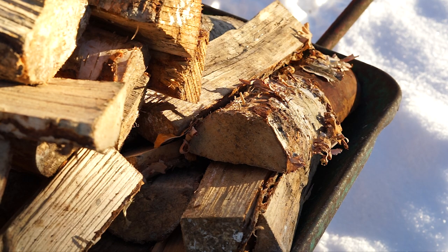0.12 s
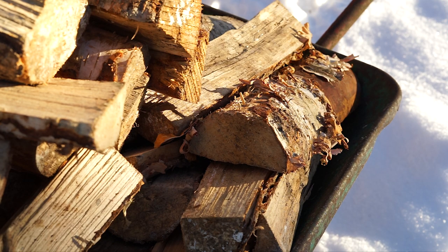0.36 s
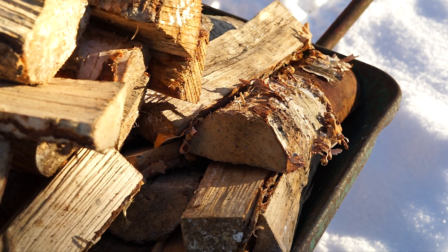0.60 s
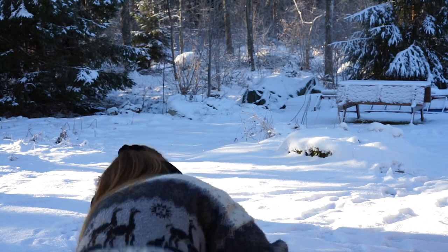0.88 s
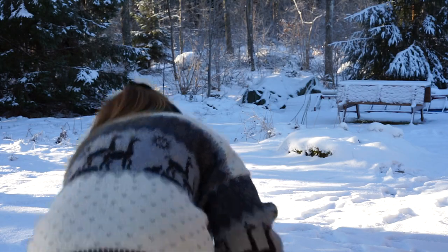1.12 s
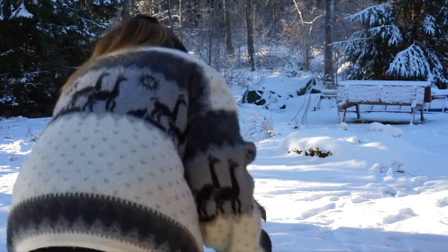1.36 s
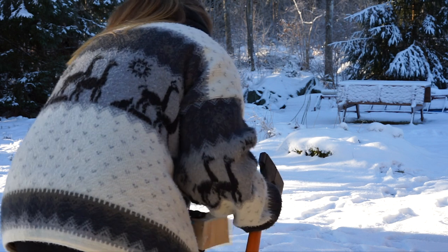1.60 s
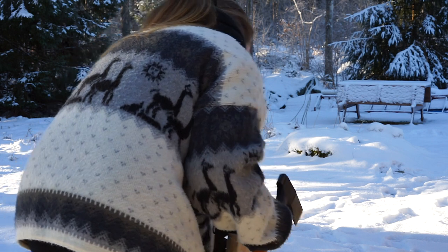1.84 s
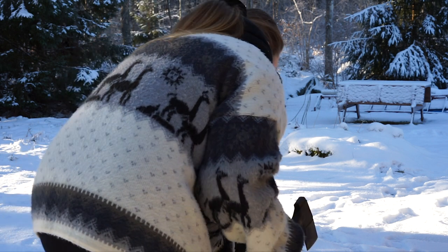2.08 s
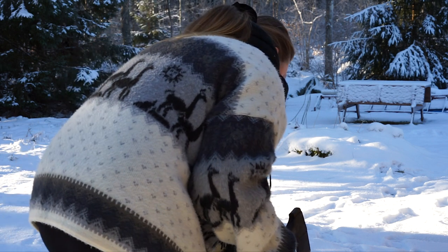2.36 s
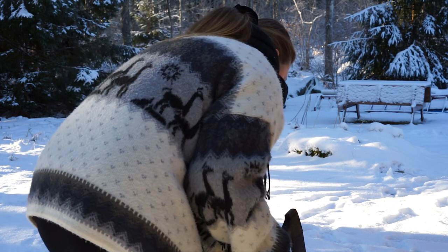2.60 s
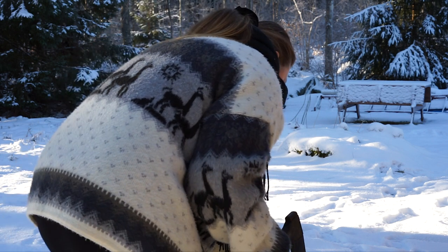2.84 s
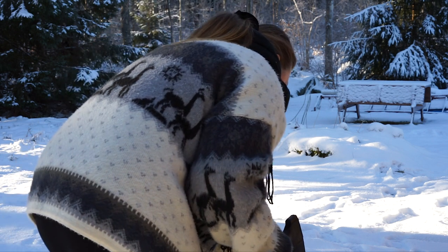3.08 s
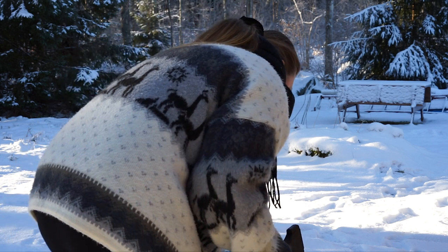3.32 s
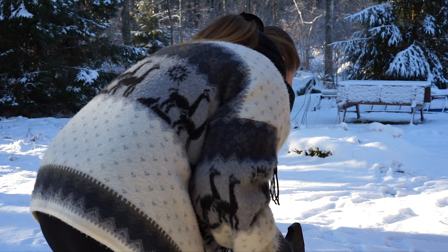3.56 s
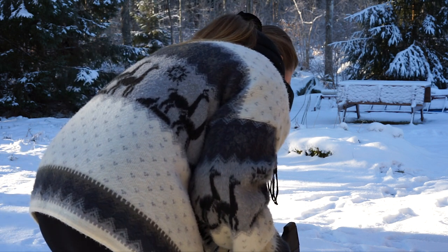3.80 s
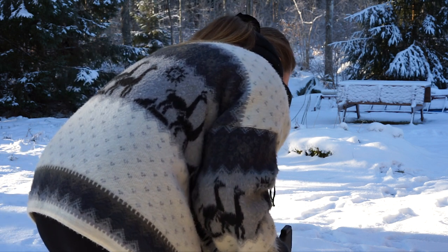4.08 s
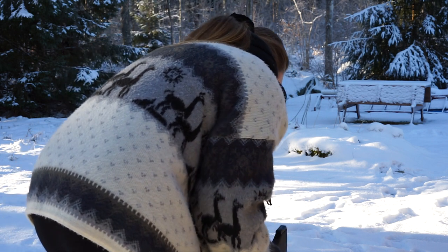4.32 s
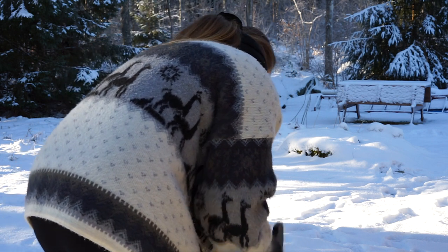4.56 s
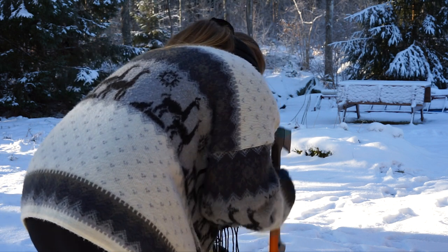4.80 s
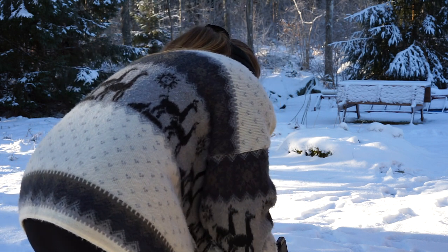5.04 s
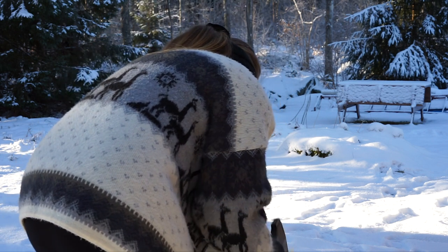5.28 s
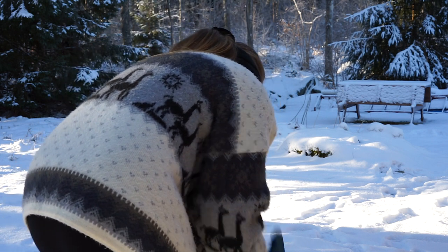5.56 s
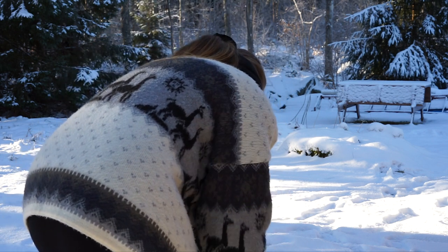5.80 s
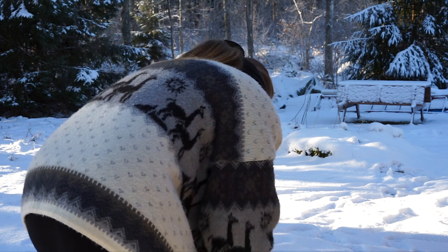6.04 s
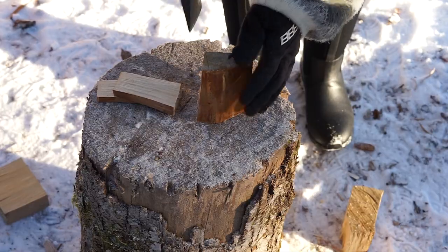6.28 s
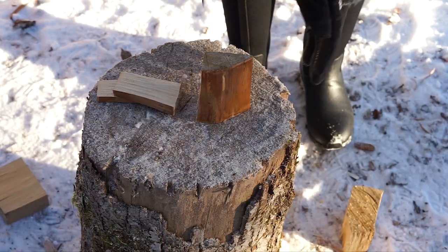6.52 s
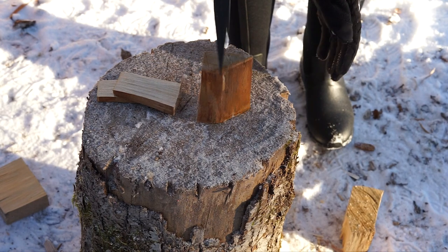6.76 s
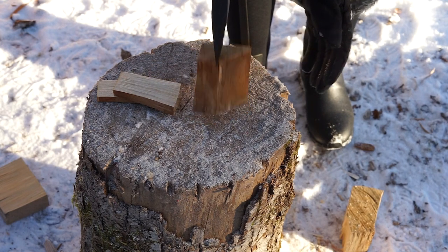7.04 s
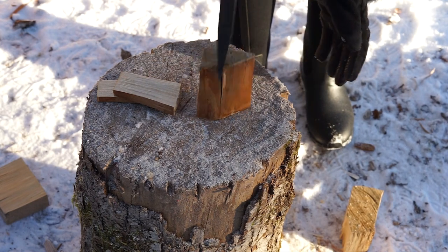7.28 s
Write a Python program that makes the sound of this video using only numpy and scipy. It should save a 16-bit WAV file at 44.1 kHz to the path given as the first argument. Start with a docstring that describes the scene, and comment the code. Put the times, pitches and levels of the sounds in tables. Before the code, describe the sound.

A hatchet splits wood on a chopping block in a snowy garden, hard cracks echoing off trees after birdsong, cloth rustle and quiet handling knocks.

```python
"""A hatchet splits billets on a chopping block in a snowy garden, heard from three spots one after another.
First, filtered noise murmurs as far traffic under a fading drone, sliding tones chirp and light taps click.
At the second spot clothes rustle in grainy noise, damped low tones thud, and struck resonances of wood and
steel crack with an answer from the trees. After a short dip in level the third spot brings thin whistles,
a faint regular ticking of noise puffs and the last two blows."""
import sys
import numpy as np
from scipy import signal
from scipy.fft import rfft, irfft, next_fast_len
from scipy.io import wavfile
from scipy.ndimage import uniform_filter1d, map_coordinates

SR = 44100
rng = np.random.default_rng(int(sys.argv[2]) if len(sys.argv) > 2 else 0)


def bounce(signal):
    """Save signal as a 16-bit WAV file at the path given by the first command-line argument."""
    frames = np.transpose(np.atleast_2d(signal))
    limited = np.clip(frames, -1, 1)
    pcm = np.round(limited * 32767).astype(np.int16)
    wavfile.write(sys.argv[1], SR, pcm)


def to_linear_factor(level_db):
    """Convert decibel levels (scalar or array-like) to linear amplitude factors."""
    exponent = np.asarray(level_db, float) / 20
    return 10 ** exponent


N = 325899
T = np.arange(N) / SR

# The three listening spots. Each row: start in seconds, then levels of murmur, near scatter and tree answer
# in dB, left-over-right balance in dB, level of the ground shudder against its thud in dB.
SPOTS = [(0, -42.5, -45, -16.5, -3, -4), (0.716, -52, -11, -21, -2.5, -5.5), (6.2, -54, -28, -44, -0.5, -8)]


def unit(x):
    """Bring to rms 1."""
    return x / np.sqrt(np.mean(x ** 2) + 1e-20)


def along(points, hz):
    """Read a curve of (Hz, value) points on a log frequency axis."""
    f, v = np.transpose(points)
    return np.interp(np.log(hz + 1), np.log(f + 1), v)


def wobble(rate):
    """A smooth random curve with rate knots a second."""
    return map_coordinates(rng.standard_normal(int(N * rate / SR) + 4), [T * rate])


def filtered(x, response):
    """Shape x by a complex response of frequency."""
    m = next_fast_len(x.shape[-1] + 8192)
    return irfft(rfft(x, m) * response(np.fft.rfftfreq(m, 1 / SR)), m)[..., :x.shape[-1]]


def add(track, s, sound):
    """Mix a sound into a track at time s; it ends where the listening spot changes."""
    end = next((row[0] for row in SPOTS if row[0] > s), N / SR)
    part = track[..., max(round(s * SR), 0):round(end * SR)][..., :sound.shape[-1]]
    part += sound[..., :part.shape[-1]]


def spot(s):
    """Index of the listening spot at time s."""
    return np.searchsorted([row[0] for row in SPOTS], s, "right") - 1


def bursts(rows, edge_s):
    """Gain curve of (start s, length s, dB) rows, each with soft edges."""
    gain = 0
    for s, length, db in rows:
        inside = np.minimum(T - s, s + length - T)
        gain = gain + to_linear_factor(db) * np.clip(inside / edge_s + .5, 0, 1) ** 2
    return gain


def rush(spectrum, alike, patchy_db):
    """Stereo noise of rms 1 with patches of random gain; alike sets the left-right likeness by frequency."""
    z = signal.stft(rng.standard_normal((2, N)), nperseg=512)[2]
    field = uniform_filter1d(rng.standard_normal(z.shape[1:]), size=6, axis=0)
    field = uniform_filter1d(field, size=12, axis=1)
    pair = signal.istft(z * to_linear_factor(patchy_db * unit(field)), nperseg=512)[1][:, :N]

    def mid_side(hz):
        turn = np.arccos(np.clip(along(alike, hz), -1, 1)) / 2
        return to_linear_factor(along(spectrum, hz)) * [np.cos(turn), np.sin(turn)]

    mid, side = filtered(pair, mid_side)
    return unit(np.array([mid + side, mid - side]))


def answers(near_db, trees_db, seconds=1):
    """A fresh stereo response of decaying noise: short scatter nearby, then a later swell from the trees."""
    # Scatter off block, logs and ground. Each row: frequency in Hz, t60 in seconds.
    near_decay = [(300, 0.2), (2000, 0.21), (6000, 0.16), (12000, 0.017)]
    # Swell of the tree answer before the treble loss. Each row: delay in seconds, level in dB.
    tree_swell = [(0, -3.5), (.075, -20), (.092, -1.5), (.113, -4.5), (.14, -9), (.2, -10.5), (.25, -17),
                  (.45, -16), (.8, -22)]
    # Colour of the tree answer before the treble loss. Each row: frequency in Hz, level in dB.
    tree_colour = [(500, -29), (1400, 5.5), (2000, 1), (3200, 5.5), (5000, 0.5), (7000, -4), (9000, -18),
                   (16000, -18)]
    far_loss_db_per_s_khz = 10  # later answers come from farther and are duller
    hz, t, z = signal.stft(rng.standard_normal((2, 2, round(seconds * SR))), SR, nperseg=256)
    near = to_linear_factor(-60 * t / along(near_decay, hz)[:, None])
    swell = np.interp(t, *np.transpose(tree_swell), right=-90)
    far_loss = far_loss_db_per_s_khz * np.outer(hz / 1000, t)
    trees = to_linear_factor(swell + along(tree_colour, hz)[:, None] - far_loss)
    lumps = uniform_filter1d(rng.standard_normal(trees.shape), size=24, axis=0)
    lumps = uniform_filter1d(lumps, size=3, axis=1)
    trees = trees * to_linear_factor(3.0 * unit(lumps))  # trunks answer one by one
    near_tail, tree_tail = signal.istft(z * np.array([near, trees])[:, None], SR, nperseg=256)[1]
    near_part = to_linear_factor(near_db) * near_tail / np.linalg.norm(near_tail[0])
    return near_part + to_linear_factor(trees_db) * tree_tail / np.linalg.norm(tree_tail[0])


def murmur():
    """Far traffic and microphone hiss as noise coloured anew at each spot; a drone of sines fades at the first."""
    # Noise colours, one list per spot. Each row: frequency in Hz, relative density in dB per Hz.
    colours = [
        [(15, -32), (25, -1), (49, -6), (190, -13.5), (277, -14), (317, -11), (363, -10.5), (463, -12),
         (818, -6.5), (1700, -19.5), (4610, -30), (16000, -38.5)],
        [(15, -22), (25, 2.5), (102, 1), (161, -3), (301, -0.5), (335, -1), (373, -3.5), (545, -3.5),
         (714, -4.5), (1790, -15), (1940, -15.5), (16000, -26)],
        [(15, -35), (25, -20), (64, -11), (127, -15), (185, -15), (326, -15.5), (384, -21), (439, -16.5),
         (796, -18), (1890, -27), (7310, -34.5), (16000, -42.5)],
    ]
    # Left-right likeness of the noise. Each row: frequency in Hz, likeness from 0 to 1.
    likeness = [(60, 0.56), (180, 0.24), (550, 0.65), (1650, 0.05), (4970, 0), (15000, 0)]
    # Drone tones before their fade. Each row: frequency in Hz, middle level in dB.
    drone_tones = [(292, -50.5), (363, -49.5)]
    here = spot(T)
    noise = 0
    for k, colour in enumerate(colours):
        noise = noise + (here == k) * to_linear_factor(SPOTS[k][1]) * rush(colour, likeness, patchy_db=1.0)
    drone = sum(to_linear_factor(db + 3.7 * wobble(21.2)) * np.sin(2 * np.pi * hz * T) for hz, db in drone_tones)
    drift = to_linear_factor(.4 * wobble(2.4))
    return noise * drift + drone * to_linear_factor(-12 * T) * (here == 0)  # the drone loses 12 dB a second


def rustle():
    """Clothes and snow rub in dense uneven grains: noise under two speeds of random gain."""
    # Movements of clothes and snow. Each row: start in seconds, length in seconds, level in dB.
    stirs = [(.05, 0.031, -49), (.37, 0.068, -52.5), (.68, 0.04, -56), (.99, 0.14, -67), (1.12, 0.085, -59),
             (1.48, 0.097, -59.5), (1.615, 0.019, -63), (1.735, 0.038, -58), (1.776, 0.014, -47.5),
             (1.855, 0.012, -46), (2.19, 0.019, -51.5), (3.24, 0.17, -63), (3.39, 0.066, -61.5),
             (3.545, 0.071, -62), (3.9, 0.13, -66), (4.04, 0.089, -65), (5.84, 0.076, -49)]
    # Brighter swishes, a sleeve sliding over cloth. Each row: start in seconds, length in seconds, level in dB.
    swishes = [(.062, .025, -56), (.345, 0.13, -54), (.55, .03, -66), (1.462, 0.095, -60), (5.86, .05, -60)]
    # Faint rustle between the movements. Each row: time in seconds, level in dB.
    fidget = [(0, -48.5), (.72, -58.5), (1.3, -63.5), (2, -64), (2.25, -93), (4.9, -77), (6.2, -76)]
    # Colour of cloth and snow. Each row: frequency in Hz, relative density in dB per Hz.
    cloth = [(800, 1.5), (2000, 3.5), (3500, 4.5), (6000, -0.5), (10000, -11), (16000, -51)]
    # Colour of the sleeve. Each row: frequency in Hz, relative density in dB per Hz.
    sleeve = [(2500, -13), (4500, -1), (9000, -4), (16000, -13)]
    edge_s = 0.024
    grains = to_linear_factor(1.4 * wobble(60) + 1.7 * wobble(400))
    level = bursts(stirs, edge_s) + to_linear_factor(np.interp(T, *np.transpose(fidget), right=-120))
    swish = bursts(swishes, edge_s) * unit(grains * rush(sleeve, [(5000, 0.44)], patchy_db=-1.5))
    return swish + level * unit(grains * rush(cloth, [(1000, 0.48), (8000, 0.4)], patchy_db=2.0))


def resonance(hz, width):
    """Response of one damped resonance, 1 at its centre."""
    return lambda f: 1j * f * width / (hz * hz - f * f + 1j * f * width)


def peak(x):
    """Bring the highest peak to 1."""
    return x / np.abs(x).max()


def cracks():
    """Tearing fibres, in blows after a first shock, excite resonances of the wood and the steel head."""
    # Hatchet blows, one biting twice. Each row: time in seconds, level of the woody body in dB,
    # hollow knock, splinter in dB against the body, decay setting of the fibres in ms,
    # steel ring in dB against the body, pitch of the piece as a factor.
    blows = [(4.9675, 1.5, -12, -3.5, 2.1, -26, 1.13), (5.6327, -4.5, -15, -10, 3.8, 7.5, 1.04),
             (5.635, -3, -10.5, -2.5, 2.1, 4.5, 1.61), (6.813, -3, -24.5, -41, 0.58, -14, 0.85),
             (7.3227, -2, -25.5, -14, 1.95, -28, 1.017)]
    # Light taps as pieces and hatchet are set down. Each row: time in seconds, body level in dB,
    # hollow knock, splinter and steel ring in dB against the body, pitch as a factor.
    light_taps = [(0.012, -22.5, -33, -14, -28, 1.3), (0.0183, -21, -39, -2.5, -31, 1.1),
                  (0.1157, -52, -4, 14.5, -5, 1.5), (0.983, -42.5, -3, -25, -9, 0.8),
                  (1.8654, -54.5, 15.5, -2, 1, 0.83), (2.1928, -49.5, 6.5, 3, -11, 0.82),
                  (3.239, -45, 4.5, -7.5, 11.5, 1.1), (3.358, -43.5, 15, -16, 1, 0.75),
                  (3.3936, -30, -0.5, -15, 5.5, 1.02), (3.5457, -59.5, 13, 16, 2, 0.83),
                  (3.906, -46.5, -9.5, 4.5, -18, 0.78), (3.9512, -58, -14, 18.5, 4, 1),
                  (4.0996, -61, 12, 8, 7, 0.65), (4.5927, -48.5, 1, -14, -11, 0.9),
                  (4.891, -50.5, 6, -7, -4, 0.93), (4.9922, -20, -18, -6, -11, 0.63),
                  (5.6572, -23, 4.5, 0, 5, 1), (5.9641, -45, 18.5, 10, -3, 0.77),
                  (6.0045, -32.5, 8, -8, -18, 0.88), (6.6547, -44, 2.5, -8, -12, 1),
                  (6.6767, -35.5, -23, -23, -17, 1.9), (6.9364, -44.5, -13, -2.5, -18, 1),
                  (7.196, -37.5, -26, -3, -23, 1.1), (7.351, -40.5, -10, 21, 0, 0.91),
                  (7.3824, -40.5, -27, 14, -12, 0.82)]
    # Softer scuffs of split pieces sliding on bark and snow. Each row: time in seconds, body level in dB,
    # hollow knock and splinter in dB against the body, decay setting of the fibres in ms.
    soft_scuffs = [(5.957, -45, 15, 15, 8.6), (6.03, -48, 3, 13.5, 13), (6.069, -53.5, -10, 14, 15),
                   (6.141, -47.5, -1, 9.5, 7.1), (7.012, -32.5, -20, -23, 2.9)]
    # Wood resonances for knock, body and splinter at pitch 1. Each row: frequency in Hz, width in Hz.
    billet = [(700, 890), (1900, 3200), (4600, 14800)]
    # Modes of the hatchet head in the softer sounds. Each row: frequency in Hz, width in Hz, level in dB.
    head = [(1845, 170, 19), (2330, 260, 4), (3900, 220, -3), (4620, 200, 4), (5750, 200, -3)]
    tap_ms, scuff_ring_db = 2.74, -11
    snap_db = -22  # bare snap of the fibres, against the splinter level
    out, t = np.zeros((2, N)), np.arange(2048) / SR
    taps = [(*row[:4], tap_ms, *row[4:]) for row in light_taps]
    scuffs = [(*row, scuff_ring_db, 1) for row in soft_scuffs]
    for s, db, knock_db, splinter_db, ms, ring_db, pitch in blows + taps + scuffs:
        fading = np.exp(-1000 * t / max(ms, .2))
        fibres = rng.standard_normal((3, len(t))) * fading
        fibres *= 1 - np.exp(-t / 0.00008)
        fibres[0, 0] = -5.0 * (db > -10)  # only a real blow opens with a shock
        fibres = fibres[0] + .95 * fibres[1:]  # each microphone hears the split from its own side
        # tearing has no pitch: every frequency gets its share
        waves = rfft(fibres)
        even_fibres = irfft(waves / np.abs(waves))
        softer_start = (db < -10) * np.exp(-t / 0.0013)
        fibres = even_fibres * np.sqrt(fading) * (6.0 - softer_start)

        # louder cracks, blows and strongest taps, have narrower wood resonances: share of each width
        focus = (.75, .72, .28) if db > -28 else (1, 1, 1)
        wood = []
        for (hz, width), share in zip(billet, focus):
            response = resonance(hz * pitch, width * pitch * share)
            wood.append(filtered(fibres, lambda f: response(f) ** 3))  # acts three times: steep skirts
        knock, body, splinter = wood
        knock = peak(knock.mean(axis=0))  # long waves reach both sides alike

        # in blows and the loudest taps the steel rings higher, dies sooner, its modes closer in level
        higher, wider, even = (1.06, 1.4, .85) if db > -22 else (1, 1, 1)

        def head_response(f):
            modes = sum(to_linear_factor(level * even) * resonance(hz * higher, width * wider)(f)
                        for hz, width, level in head)
            return resonance(3000, 5000)(f) ** 2 * modes

        steel = peak(filtered(fibres, head_response))
        crack = to_linear_factor(knock_db) * knock - peak(body) + to_linear_factor(splinter_db) * peak(splinter)
        crack = crack + to_linear_factor(ring_db) * steel + to_linear_factor(splinter_db + snap_db) * peak(fibres)
        crack = to_linear_factor(db) * crack
        near_db, trees_db, pan_db = SPOTS[spot(s)][2:5]
        add(out, s + 0.00087, crack * to_linear_factor([[pan_db / 2], [-pan_db / 2]]))
        answer_s = .85 if db > -20 else .18  # faint answers sink sooner into the murmur
        answer = signal.fftconvolve(crack, answers(near_db, trees_db, answer_s), axes=1)
        add(out, s + .003, answer)
    return out


def birds():
    """Small birds as gliding sines, hoarse slides and chatter of random-gain tones, smeared by the garden."""
    # Thin falling notes. Each row: start in seconds, swell in seconds, hold in seconds, start in Hz, level in dB.
    whistles = [(6.365, 0.2, 0.0235, 7410, -58.5), (7.028, 0.067, 0.14, 7300, -49)]
    # Sliding chirps. Each row: start in seconds, length in seconds, start in Hz, end in Hz, level in dB.
    chirps = [(.03, .07, 6800, 4500, -44), (.064, .02, 2300, 3200, -49), (.219, .08, 7300, 4400, -49.5),
              (.27, .022, 2300, 3400, -51), (.337, .07, 7200, 4600, -48), (.497, .022, 2300, 3400, -51),
              (.593, .04, 4500, 7300, -52), (.681, .04, 6800, 4200, -53), (6.528, .04, 6200, 3900, -60),
              (7.12, .04, 6200, 4000, -59)]
    # Rough chatter of several birds. Each row: start in seconds, length in seconds, middle in Hz, level in dB.
    chatter = [(0.03, 0.062, 2350, -53), (0.11, 0.076, 2290, -57), (0.2, 0.094, 2300, -55),
               (.33, 0.18, 2368, -54.5), (.62, 0.12, 2280, -70), (6.525, 0.037, 4310, -62.5),
               (6.565, 0.043, 3520, -63), (6.61, .045, 4170, -65), (6.965, 0.13, 4000, -65.5),
               (7.125, 0.058, 4080, -57.5)]
    sag_hz_per_s, swell_db, tail_db, tail_s = 1050, 13, -21, .07  # shape of a whistle
    slide_s = .0045
    chatter_edge_s, chatter_spread = 0.033, .1
    out = np.zeros(N)
    quaver_hz, quaver_db = 28 * wobble(70), 3 * wobble(45)
    for s, swell, hold, start_hz, db in whistles:
        pitch = start_hz - sag_hz_per_s * np.clip(T - s, 0, swell + hold) + quaver_hz
        stages = s + np.cumsum([-.02, .02, swell, hold, .03, tail_s, .02])
        stage_db = [-50, -swell_db, 0, -3, tail_db, tail_db + 5, -50]
        shape_db = np.interp(T, stages, stage_db, left=-90, right=-90)
        out += to_linear_factor(db + shape_db + quaver_db) * np.sin(2 * np.pi * np.cumsum(pitch) / SR)
    hoarse = wobble(500)
    for s, length, start_hz, end_hz, db in chirps:
        u = np.arange(round(length * SR)) / (length * SR)
        first = round(s * SR)
        # the slide is fast at first, then levels off
        pitch = end_hz + (start_hz - end_hz) * np.exp(-u * length / slide_s)
        pitch = pitch + 320 * hoarse[first + 999:][:len(u)]
        roughness = 1 + .4 * hoarse[first:][:len(u)]
        voice = np.sin(2 * np.pi * np.cumsum(pitch) / SR) * roughness
        swell = (1 - np.exp(-60 * u)) * (1 - u) * (.6 + np.exp(-u * length / .012))
        add(out, s, to_linear_factor(db) * swell * voice)
    s, length, hz, db = np.transpose(chatter)
    middle = hz[np.maximum(np.searchsorted(s - chatter_edge_s, T) - 1, 0)]
    voices = 0
    for _ in range(3):
        strength = wobble(400)
        pitch = middle * (1 + chatter_spread * wobble(60))
        voices = voices + strength * np.sin(2 * np.pi * np.cumsum(pitch) / SR)
    out += bursts(zip(s, length, db), chatter_edge_s) * unit(voices)
    smear = signal.fftconvolve(out[None], answers(near_db=-8, trees_db=-15), axes=1)[:, :N]
    return out * to_linear_factor([[.7], [-.7]]) + smear


def thuds():
    """Weight on block or ground: a low mode and a short higher push, struck softly; the handle rings on."""
    # Weight reaching the block or the ground. Each row: time in seconds, level of the low mode in dB,
    # its frequency in Hz, its t60 in seconds, level of the higher push against it in dB.
    weights = [(1.378, -56, 116, 0.11, 21), (1.853, -36.5, 75.4, 0.076, 9), (2.192, -33, 88.5, 0.097, -7),
               (2.515, -53, 136, 0.057, 20), (3.238, -23.5, 116, 0.062, 4.5), (3.361, -27.5, 108, 0.049, 6),
               (3.393, -33, 119, 0.12, -1), (3.544, -33.5, 108, 0.079, 5), (4.092, -38.5, 112, 0.049, 6.5),
               (4.583, -45, 134, 0.042, 16.5), (4.889, -43.5, 139, 0.059, 15), (4.97, -10, 88, 0.084, 5),
               (5.633, -15.5, 115, 0.042, -9), (5.656, -18.5, 108, 0.17, 10),
               (5.786, -22.5, 127, 0.03, -5.5), (5.961, -38, 114, 0.055, 17),
               (6.008, -16, 124.6, 0.052, 4.5), (6.034, -25.5, 77, 0.054, -3),
               (6.142, -32.5, 127, 0.037, -9), (6.504, -41.5, 96, 0.051, 11),
               (6.653, -44.5, 117, 0.074, 12.5), (6.813, -19, 102.6, 0.26, 14),
               (7.324, -28.5, 110, 0.22, 13.5)]
    # Blows that set the handle ringing. Each row: time in seconds, level in dB.
    handle_rings = [(4.969, -24), (5.658, -34.5), (6.815, -52), (7.325, -38)]
    handle_hz, handle_t60_s = 306, 0.37  # bending of the handle
    gripped_s = 6.9  # a hand stops the ringing
    out, t = np.zeros(N), np.arange(SR // 2) / SR

    def held(s):
        return np.exp(-np.maximum(s + t - gripped_s, 0) / 0.0032) if s < gripped_s else 1

    for s, db, hz, t60, push_db in weights:
        low = to_linear_factor(-60 * t / max(t60, .02)) * np.sin(2 * np.pi * hz * t)
        push = to_linear_factor(push_db - 60 * t / 0.024) * np.sin(2 * np.pi * 1.64 * hz * t)
        thud = -to_linear_factor(db) * (low + push) * (1 - np.exp(-t / 0.0023))
        ground = rng.standard_normal(len(t)) * to_linear_factor(-60 * t / 0.22)  # the frozen ground shudders on unevenly
        shudder = signal.fftconvolve(thud, ground / np.linalg.norm(ground))[:len(t)]
        add(out, s + 0.002, held(s) * (thud + to_linear_factor(SPOTS[spot(s)][5]) * shudder))
    for s, db in handle_rings:
        ring = to_linear_factor(db - 60 * t / handle_t60_s) * np.sin(2 * np.pi * handle_hz * t)
        add(out, s, held(s) * ring * (1 - np.exp(-t / 0.036)))
    return filtered(out, lambda f: (1j * f / (45 + 1j * f)) ** 4)  # small microphones miss the deepest push


def splitting():
    """The grain tears on: spiky noise that dies away as the crack runs down the billet; trees return it too."""
    # Tearing after a blow. Each row: start in seconds, level in dB, t60 in seconds.
    splits = [(4.968, -35.5, 0.22), (5.638, -40, 0.82), (6.814, -23.5, 0.071), (7.327, -24, 0.14)]
    # Colour of the tearing. Each row: frequency in Hz, relative density in dB per Hz.
    tearing = [(500, -10.5), (1200, -4), (2600, -7), (5000, -14), (9000, -14.5), (16000, -24.5)]
    level = np.zeros(N)
    for s, db, t60 in splits:
        level += to_linear_factor(db - 60 * np.maximum(T - s, 0) / t60) * (T > s)
    spikes = to_linear_factor(2.5 * wobble(1500))
    grains = level * unit(spikes * rush(tearing, [(800, 0.7), (6000, 0.15)], patchy_db=4))
    second_spot = spot(T) == 1  # the only one with this echo
    echo = signal.fftconvolve(grains * second_spot, answers(near_db=-3.5, trees_db=-4), axes=1)
    return grains + echo[:, :N] * second_spot


def ticking():
    """A faint ticking, perhaps a lens motor: short noise puffs in one band at a steady rate, uneven in size."""
    # Runs of ticking. Each row: start in seconds, length in seconds, level in dB.
    runs = [(6.205, 0.15, -60), (6.385, 0.03, -54.5), (6.445, 0.22, -58), (6.645, .02, -62),
            (6.72, 0.089, -60.5), (6.98, 0.16, -55.5), (7.23, 0.054, -59)]
    # Colour of a tick. Each row: frequency in Hz, relative density in dB per Hz.
    tick_colour = [(1900, -36), (2400, -3), (2900, 3), (3300, -5), (3800, -42)]
    rate_hz, first_s, width_s = 50, 6.2145, .0022
    away = ((T - first_s) * rate_hz + .5) % 1 - .5  # distance from the nearest tick, in ticks
    puffs = np.exp(-.5 * (away / (rate_hz * width_s)) ** 2) * to_linear_factor(1.5 * wobble(30))
    return bursts(runs, .01) * puffs * rush(tick_colour, [(3000, 0.45)], patchy_db=.7)


def scene():
    """All layers together, with a short dip in level between the second and third spots."""
    # Overall level. Each row: time in seconds, gain in dB.
    dip = [(0, -3.5), (6.185, -4.5), (6.2, -13.5), (6.225, 0.5), (7.4, 0.5)]
    layers = murmur() + rustle() + cracks() + birds() + thuds() + splitting() + ticking()
    return layers * to_linear_factor(np.interp(T, *np.transpose(dip)))


def band_limit(x):
    """A steep low-pass at the top of the band."""
    return signal.sosfilt(signal.butter(12, 16580, fs=SR, output="sos"), x)


def record(dry):
    """Finish the mix: a steep band limit, then peaks clipped at 0.93 of full scale."""
    top_hz = 16060
    limited = filtered(dry, lambda hz: 1 / (1 + (hz / top_hz) ** 60))
    mix = np.clip(limited, -.93, .93)
    return band_limit(mix)


dry = scene()
out = record(dry)
bounce(out)
```